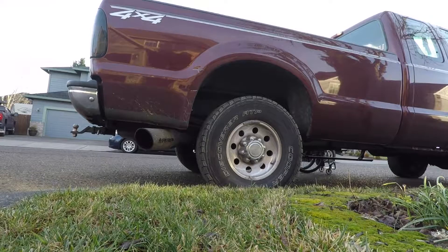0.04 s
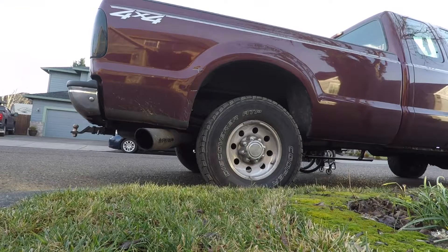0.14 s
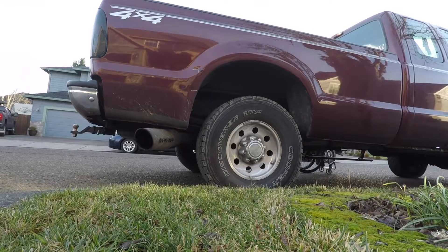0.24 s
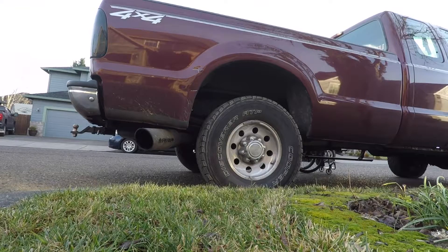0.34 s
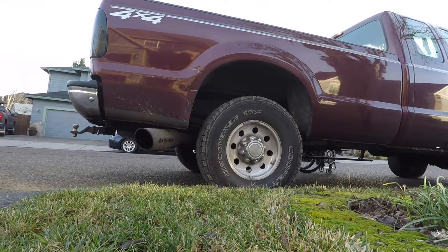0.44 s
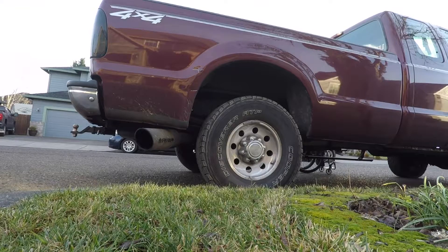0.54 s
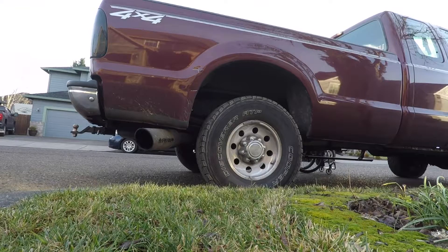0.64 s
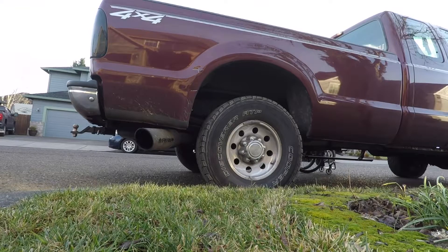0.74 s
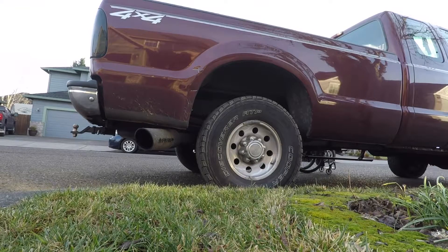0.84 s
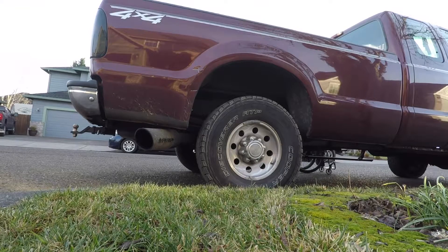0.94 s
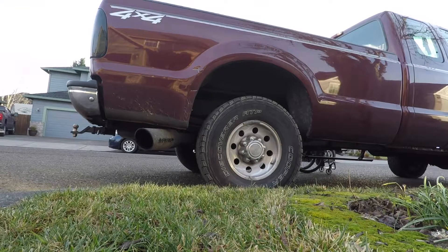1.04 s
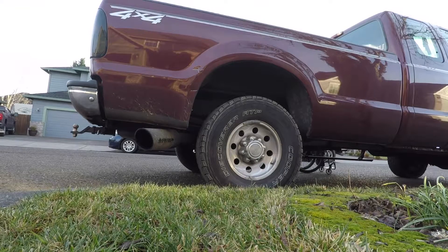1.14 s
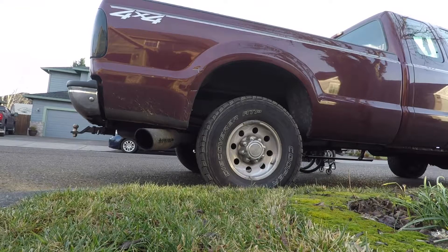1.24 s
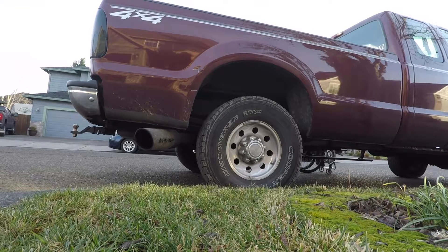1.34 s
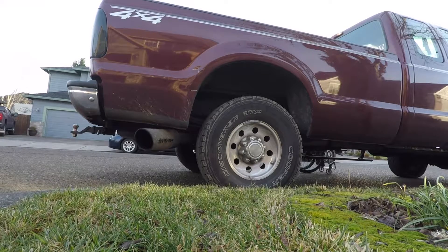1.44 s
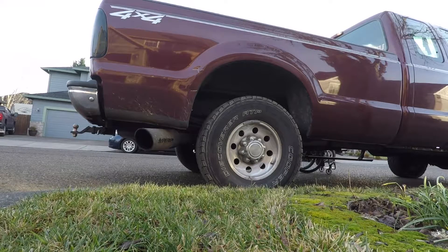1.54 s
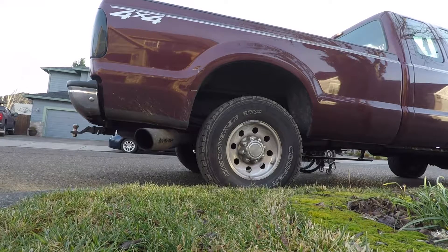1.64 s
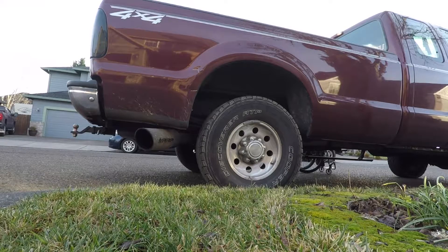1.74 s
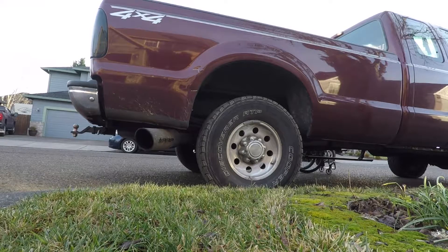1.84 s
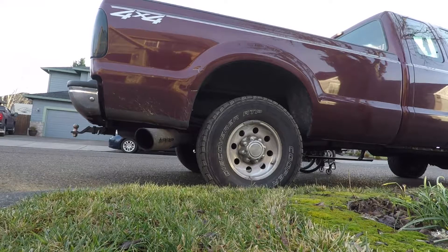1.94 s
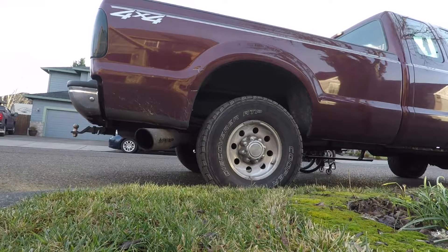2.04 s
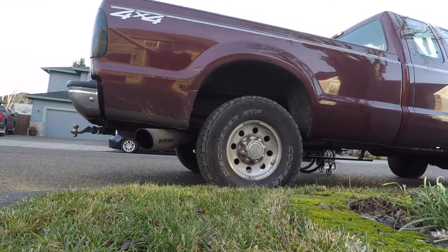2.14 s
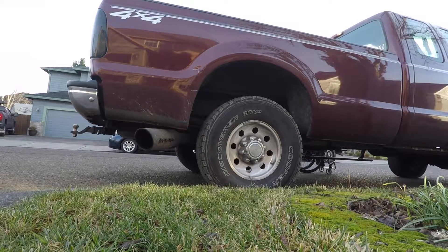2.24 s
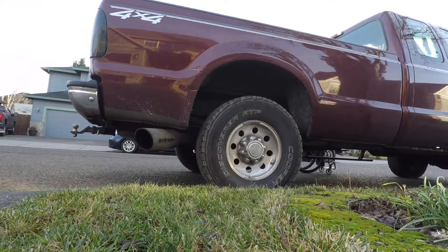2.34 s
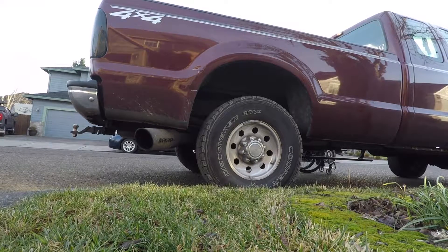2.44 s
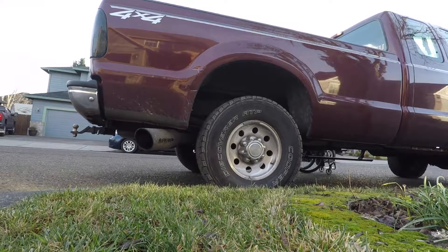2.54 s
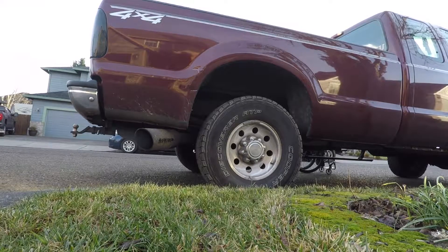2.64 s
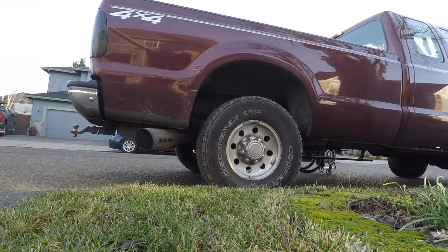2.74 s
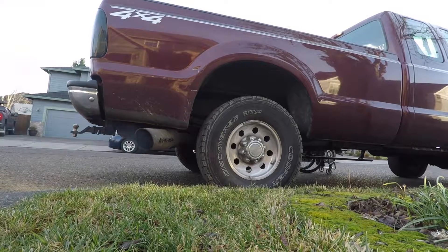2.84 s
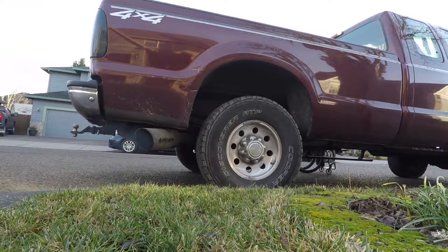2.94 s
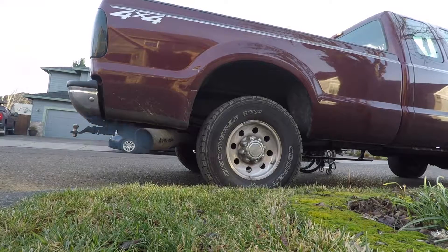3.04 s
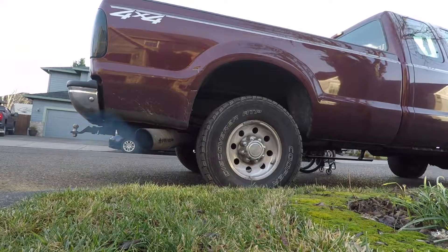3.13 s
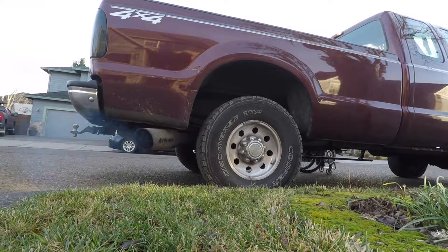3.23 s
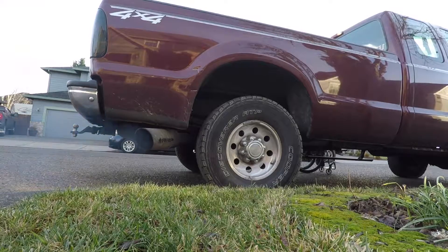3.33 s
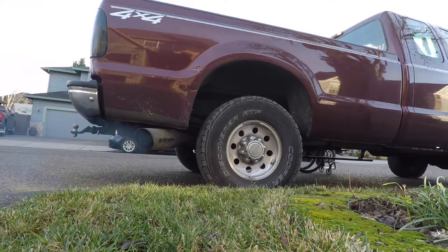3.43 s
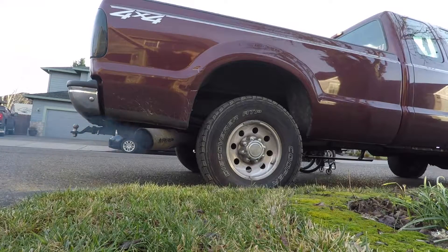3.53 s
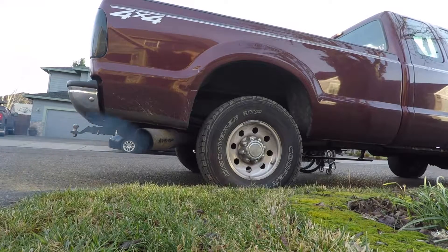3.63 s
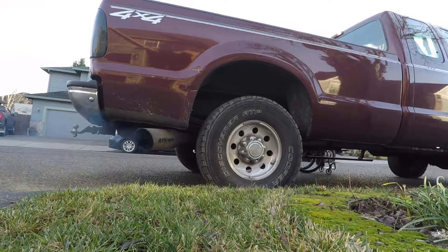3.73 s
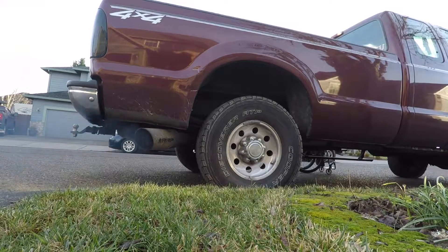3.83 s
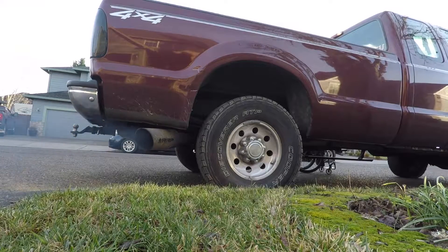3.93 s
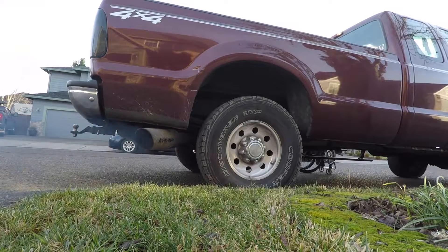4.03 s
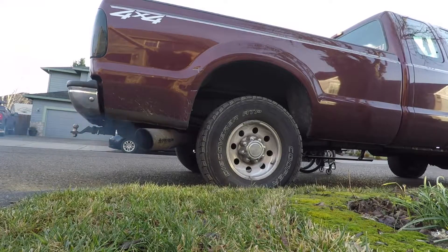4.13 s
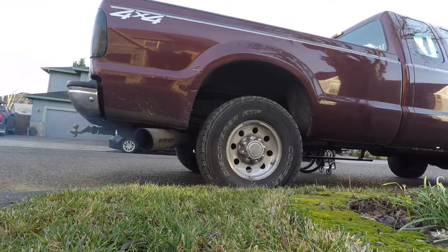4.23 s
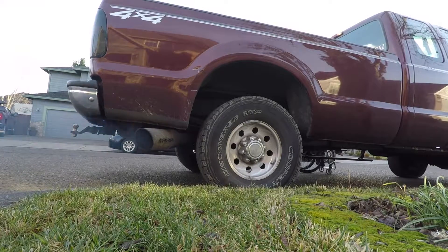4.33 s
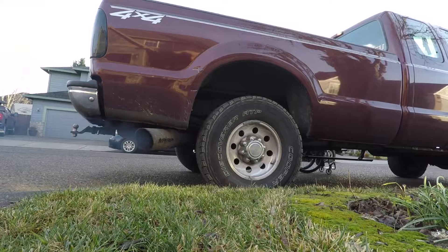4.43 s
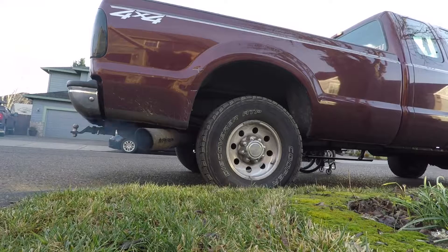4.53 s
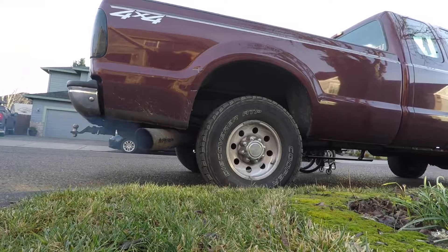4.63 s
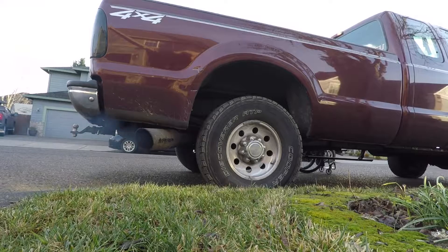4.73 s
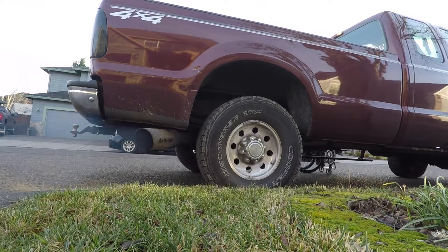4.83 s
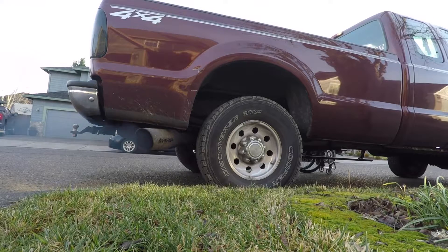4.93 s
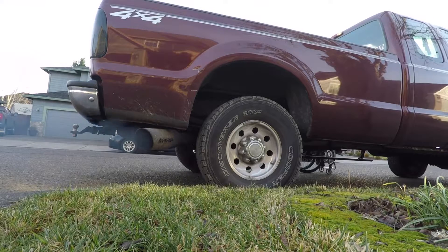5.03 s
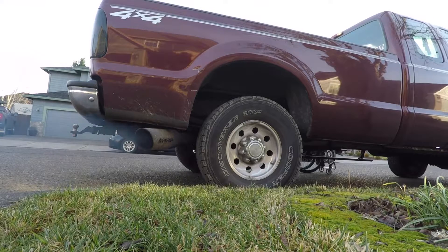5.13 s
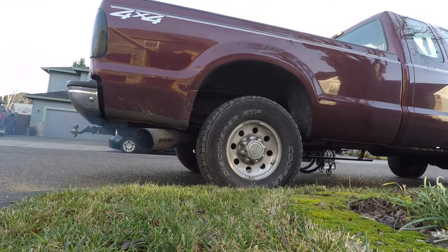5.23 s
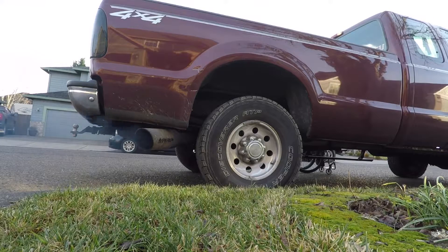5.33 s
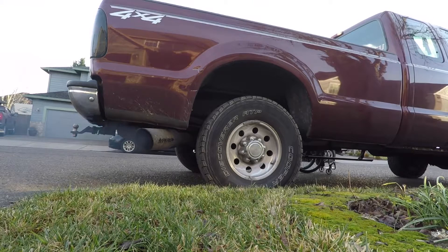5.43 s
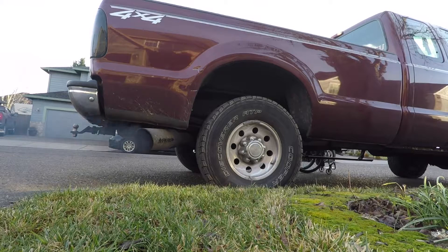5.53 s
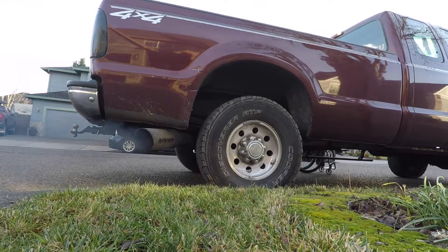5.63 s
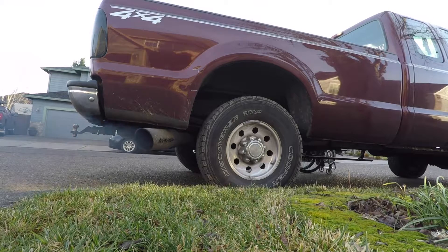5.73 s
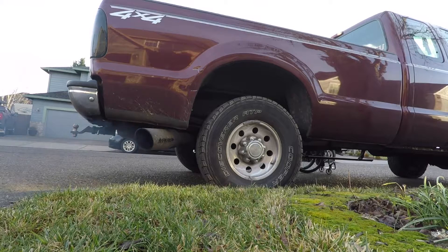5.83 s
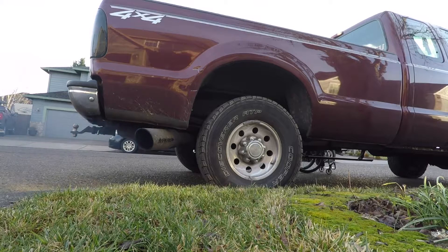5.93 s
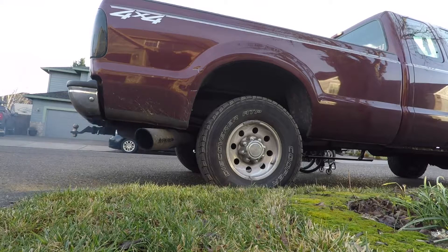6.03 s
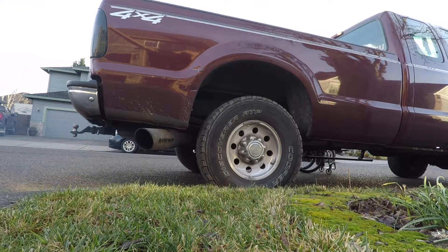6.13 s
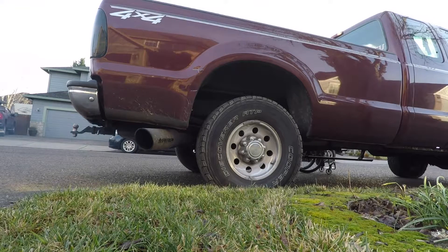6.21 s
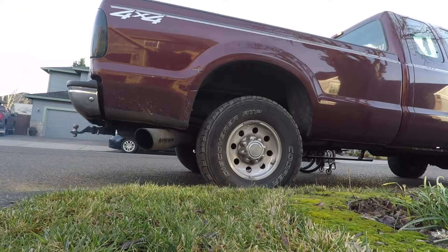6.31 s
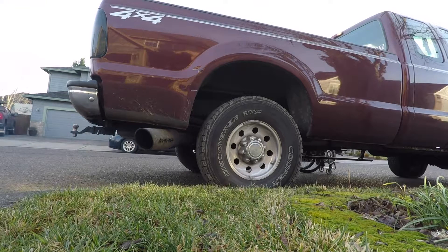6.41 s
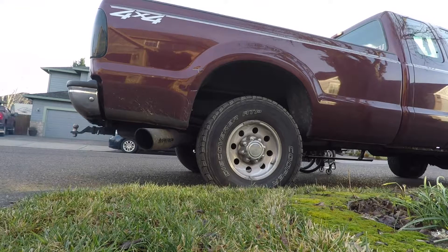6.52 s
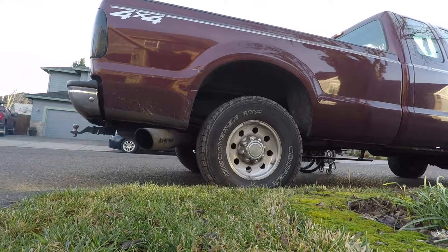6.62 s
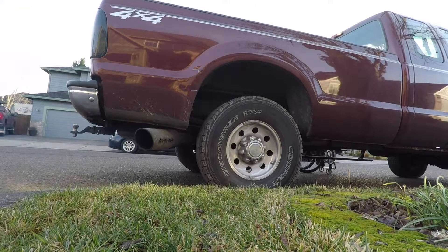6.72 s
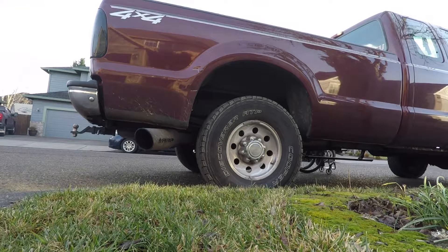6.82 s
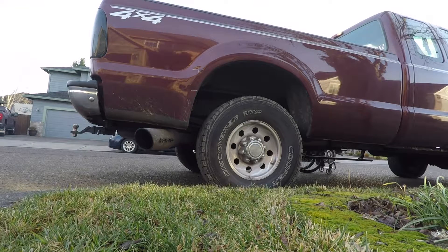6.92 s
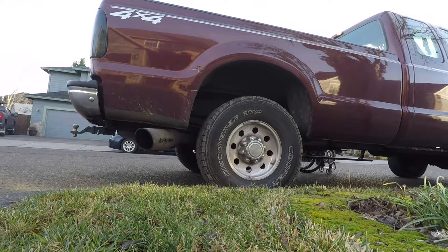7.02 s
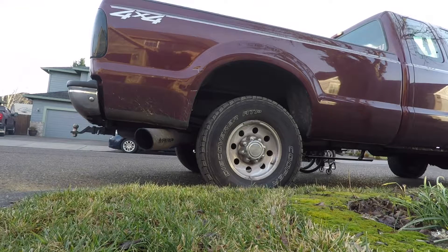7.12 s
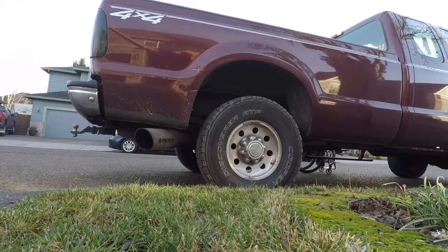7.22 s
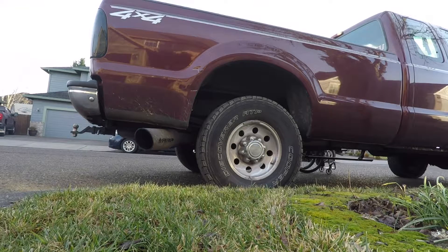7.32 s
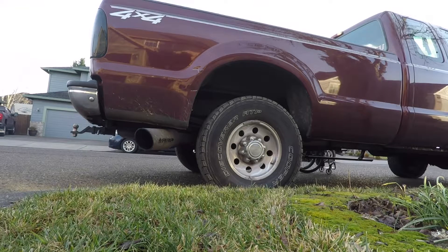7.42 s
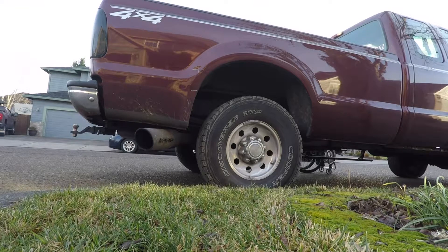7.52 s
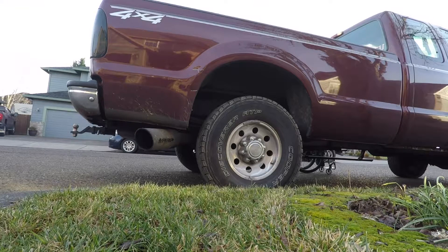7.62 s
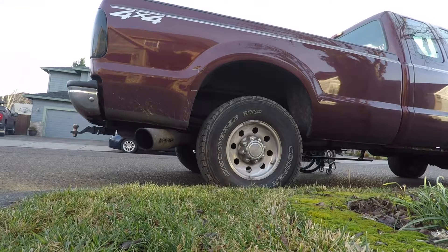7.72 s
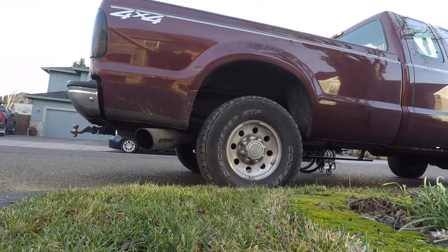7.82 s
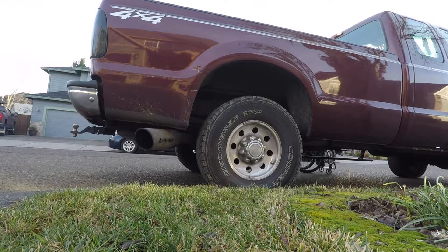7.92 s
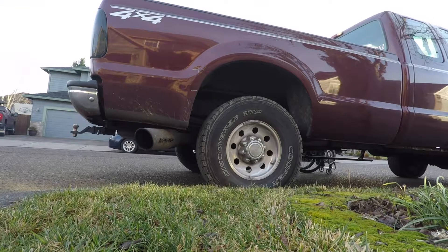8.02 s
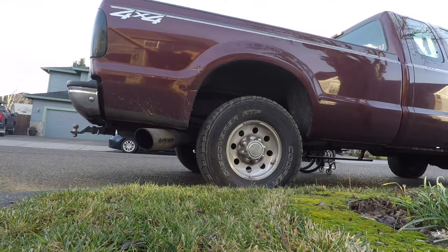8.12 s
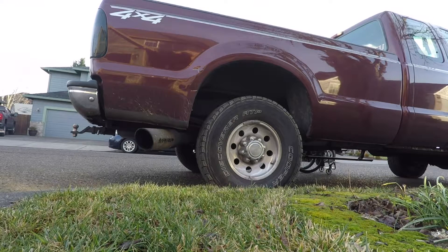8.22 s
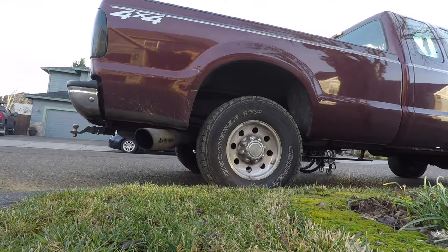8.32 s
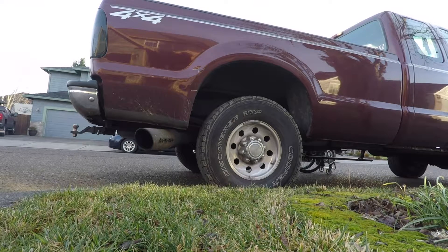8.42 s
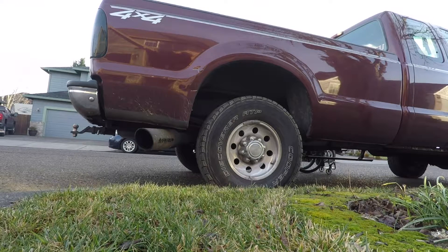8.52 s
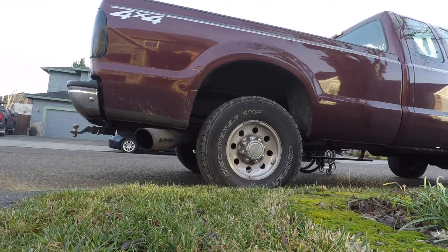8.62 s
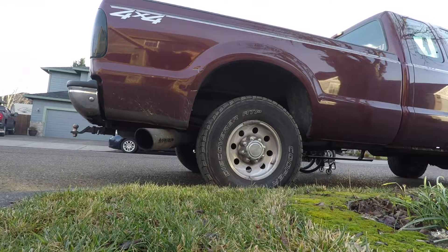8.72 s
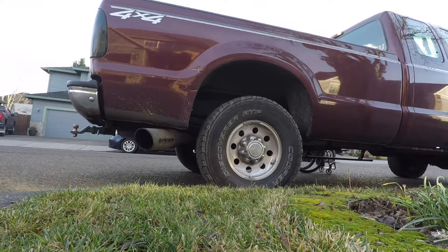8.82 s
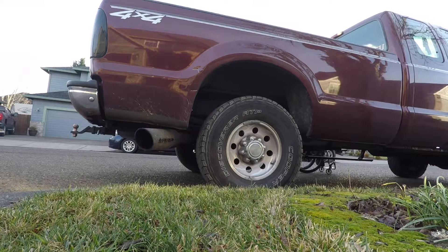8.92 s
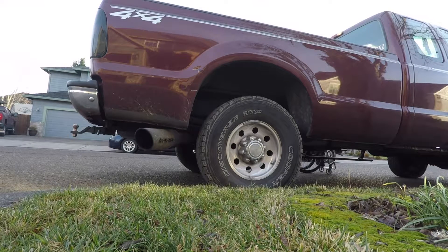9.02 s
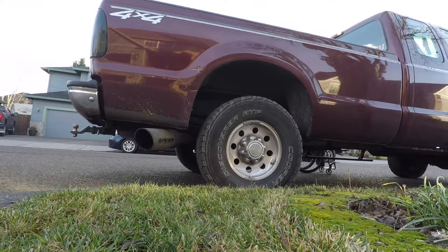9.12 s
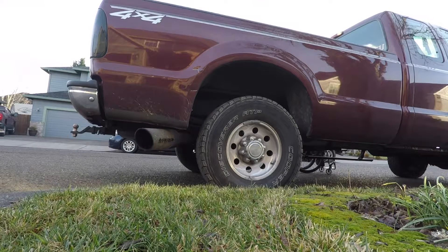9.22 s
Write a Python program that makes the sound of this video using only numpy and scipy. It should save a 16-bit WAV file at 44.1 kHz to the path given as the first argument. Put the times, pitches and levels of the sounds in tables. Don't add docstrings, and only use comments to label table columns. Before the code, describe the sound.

A starter clunks and grinds, then a big cold diesel catches, surging in six loud uneven bursts before settling into a slowly rising clattering idle.

```python
import sys
import numpy as np
from scipy import signal
from scipy.io import wavfile
from scipy.ndimage import uniform_filter1d

SR = 44100
rng = np.random.default_rng(int(sys.argv[2]) if len(sys.argv) > 2 else 0)


def makeup_ratio(level_db):
    decades = np.asarray(level_db, float) / 20
    return 10 ** decades


def bounce(signal):
    frames = np.transpose(np.atleast_2d(signal))
    limited = np.clip(frames, -1, 1)
    pcm = np.round(limited * 32767).astype(np.int16)
    wavfile.write(sys.argv[1], SR, pcm)


N = 408366
CRANKING = 2 * SR

# pitch_hz, density_db [dB per Hz]
AIR = [(140, -24), (230, -7), (310, -2.5), (382, -9), (755, -10), (838, -13.5), (5350, -31), (9850, -24.5),
       (15000, -40.5)]

# pitch_hz, density_db [dB per Hz]
GRIND = [(530, -50), (900, 1), (1270, -4), (1370, -4.5), (1620, -2.5), (1980, -1.5), (3170, -5),
         (4510, -5.5), (6580, -10), (7230, -16.5), (9040, -19.5), (11300, -33.5), (12700, -23),
         (15000, -40)]
# pitch_hz, density_db [dB per Hz]
GROWL = [(70, -80), (130, -26), (170, -7), (225, -17.5), (262, -8), (300, -14), (410, -10.5), (650, -19.5),
         (770, -18.5), (900, -44), (1200, -44)]
# pitch_hz, density_db [dB per Hz]
LURCH = [(15, -24), (30, -5.5), (45, -7.0), (70, -16.5), (130, -17), (200, -29)]
# pitch_hz, width_hz, lift_db
HOUSING = [(422, 34, 4.6), (747, 38, 8), (1464, 41, 7.3), (1770, 34, 9.2), (1970, 45, 6.3), (2510, 67, 6.6),
           (2900, 47, 7.7), (3560, 45, 6.1)]
# pitch_hz, width_hz, level_db
MESH = [(2195, 170, -14.5), (4130, 390, -16.5)]
# deepest_s, depth_db
COMPRESSIONS = [
    (.47, 3),
    (.595, 3),
    (.72, 3),
    (.84, 4),
    (0.961, 4),
    (1.08, 3),
    (1.21, 2.5),
    (1.309, -1),
]
# start_s, peak_db, pitch_hz
CLUNKS = [(0.062, -23, 301), (0.11, -13.5, 360), (0.129, -2.5, 427), (0.191, -16, 466), (0.381, -10, 454),
          (0.531, -14.5, 473.3), (0.649, -24, 566), (0.776, -28, 400), (0.88, -10, 374.3),
          (0.999, -9.5, 405), (1.119, -35, 408), (1.249, -14, 400), (1.419, -11, 680)]
# start_s, peak_db, pitch_hz
SNATCHES = [(0.3445, -26, 2150), (0.4508, -28, 2050), (0.4812, -24.5, 1400), (0.5465, -21, 2150),
            (0.608, -24, 1530), (0.6653, -22, 2040), (0.735, -23, 2540), (0.854, -23, 1374),
            (0.9741, -23, 1440), (1.026, -24.5, 2020), (1.0945, -20, 1400), (1.2245, -24, 2670),
            (1.3108, -24.5, 1550)]
# time_s, pitch_hz, level_db
OVERRUN = [
    (1.25, 3930, -11),
    (1.36, 4020, -10),
    (1.424, 4300, -11),
    (1.47, 4600, -5),
    (1.5, 4800, -24),
]

# start_s, cut_s, top_firing_hz, fuel_share [0-1], coast_s
SURGES = [
    (1.439, 1.722, 84.65, 0.88, 0.13),
    (2.043, 2.204, 69.86, 0.95, .11),
    (2.492, 2.669, 72.12, 0.97, 0.13),
    (3.015, 3.195, 75.9, 0.99, 0.14),
    (3.531, 3.704, 77, 0.98, .125),
    (4.005, 4.198, 78.56, 0.98, 0.19),
]
# time_s, firing_hz, fuel_share [0-1]
GOVERNOR = [(4.57, 31.83, 0.15), (4.635, 39.5, 0.79), (4.74, 45.57, 0.64), (4.87, 40.17, 0.44),
            (5.0, 34.86, 0.36), (5.07, 38.38, 0.74), (5.2, 41.96, 0.72), (5.27, 41.87, 0.61),
            (5.38, 40.13, 0.61), (5.56, 42.84, 0.69), (5.8, 42.83, 0.64), (6.2, 45.2, 0.65),
            (6.6, 47.12, 0.66), (6.9, 49.38, 0.72), (7.4, 51.05, 0.66), (8.4, 52.99, 0.72),
            (8.8, 53.29, 0.71), (9.26, 54.27, 0.75)]
# thump_db, lateness [share of firing gap], blast_db, clatter_db
CYLINDERS = [(2, 0.013, -3, 6.5), (-1, 0.043, 1, 7.5), (1, 0.0133, -4.5, -2.5), (-2, -0.0487, -1.5, 8.5),
             (0.2, 0.0094, 0.5, 6), (1.5, 0.0492, 1.5, 12), (1, -0.016, -1, 4), (0.2, -0.052, 0.5, 6)]

# pitch_hz, gain_db
PIPE = [(15, -29), (28, -24.5), (43, 0.5), (53, 4), (68, -0.5), (87, 3), (104, -0.5), (120, -5.5),
        (138, -12.5), (156, -7), (185, -12.5), (225, -10.5), (280, -29), (400, -40.5)]
# pitch_hz, width_hz, lift_db
PIPE_RINGS = [(88.6, 7.2, 5.5), (121, 11, 10.5), (150.8, 7.2, 5), (189, 5.8, 4.5), (222.9, 10.5, 6)]
# pitch_hz, density_db [dB per Hz]
RUMBLE = [(8, -18.0), (25, 1), (50, -2), (120, -5.5), (170, -8), (230, -10.5), (262, -30.0)]
# pitch_hz, gain_db
BOOM = [(50, -26.0), (85, -0.5), (120, 13), (150, -9.0), (190, 3.0), (260, -31)]

# pitch_hz, density_db [dB per Hz]
BLAST = [(100, -22.5), (175, -3.5), (220, -3.5), (258, -8), (338, 1), (422, -3.5), (502, -4), (536, -9.5),
         (647, -3), (856, -18.5), (969, -16.5), (1100, -31), (1250, -28.5), (1620, -59), (2750, -120)]
# pitch_hz, density_db [dB per Hz]
COAST = [(140, -21), (200, -4), (349, -0.5), (533, -6), (686, -8), (925, -15.5), (1500, -26), (1950, -79),
         (3300, -120)]
# pitch_hz, width_hz, lift_db
COAST_RINGS = [(187, 23, 8.7), (772, 44, 5.3)]
# start_s, peak_db, pitch_hz
BARKS = [(1.502, -4, 573), (1.528, -6, 390), (1.556, -7.5, 515), (1.579, -1, 425), (1.637, -4, 660),
         (1.74, -10.5, 652), (1.773, -14, 594), (1.871, -18, 656), (1.937, -17.5, 430),
         (2.021, -21, 444), (2.057, -15, 557), (2.085, -21, 336), (2.106, -4.5, 356), (2.151, -3, 554),
         (2.535, -12, 424), (2.558, -9.5, 387.6), (2.575, -9, 546), (2.6, -7, 396),
         (2.671, -15.5, 452), (2.884, -21, 407), (2.966, -26, 511), (3.035, -18, 484),
         (3.055, -13, 403.3), (3.088, -3.5, 340), (3.123, -2, 447), (3.167, -7.5, 666),
         (3.407, -26, 645), (3.486, -26.5, 300.9), (3.525, -20, 421), (3.568, -20, 301),
         (3.568, -14, 310), (3.607, 1, 340), (3.642, -4.5, 776), (3.684, -6.5, 657), (3.729, -14, 629),
         (4.043, -13.5, 435.3), (4.067, -8, 480), (4.087, -8, 410), (4.108, -1, 447),
         (4.196, -3.5, 593), (4.229, -16, 655), (4.461, -18.5, 345), (4.53, -15.5, 338.6),
         (4.559, -16, 452.7), (4.598, -16, 533), (4.617, -6, 354), (4.649, -11, 355), (4.69, -10, 413),
         (4.717, -13, 431.8), (4.752, -9, 452), (4.804, -8.5, 676.4), (4.898, -23, 633),
         (4.93, -14.5, 590.5), (4.984, -17, 317.3), (5.023, -12, 343), (5.079, -11.5, 530),
         (5.146, -8, 366), (5.193, -15, 636), (5.386, -10.5, 339), (5.486, -8, 644),
              (5.61, -8.5, 470.9), (5.672, -17, 680), (5.703, -9.5, 367), (5.769, -7, 330.8),
              (5.857, -11, 322.6), (5.908, -9, 580), (6.214, -14.5, 650.3), (6.303, -14.5, 462.6),
              (6.435, -13.5, 471), (6.477, -9, 336), (6.518, -6, 350), (6.584, -12, 473),
              (6.647, -13.5, 638), (6.775, -14.5, 587), (6.811, -15.5, 353), (6.935, -11, 606),
              (7.058, -18, 646), (7.159, -13, 334), (7.258, -10, 603), (7.403, -4, 705),
              (7.569, -4.5, 333.2), (7.84, -9.5, 637), (7.995, -8, 298), (8.147, -12, 630),
              (8.299, -10.5, 300), (8.376, -11.5, 670), (8.45, -13, 346.1), (8.489, -7.5, 357),
              (8.527, -16, 326), (8.641, -10.5, 658), (8.679, -17, 322), (8.83, -8, 509.8),
              (8.978, -8, 480), (9.05, -8, 659), (9.091, -10.5, 534), (9.236, -12.5, 597)]

# pitch_hz, density_db [dB per Hz]
CLATTER = [(590, -35), (1000, -7), (1120, -14), (1210, -4), (1650, 0), (2740, -13), (2970, -11.5),
           (4030, -11), (4310, -18), (5660, -23), (6060, -24), (7600, -25.5), (11200, -47), (12900, -38.5),
           (15000, -49.5)]
# pitch_hz, density_db [dB per Hz]
HARD_CLATTER = [(590, -11), (1000, 5), (1170, -39), (1390, -3.5), (1700, -2), (2370, -8.5), (2740, -18.5),
                (2930, -8.5), (3440, -4.5), (5290, -19), (6200, -17.5), (8200, -25.5), (11200, -42.5),
                (13100, -35.5), (15000, -42)]
# pitch_hz, width_hz, lift_db
BLOCK = [(1610, 170, 2.25), (2056, 59, 4.8), (2580, 25, 1.3), (2984, 100, 4.1), (3420, 77, 3.3),
         (3920, 92, 0.92), (4704, 140, 6.3), (6180, 180, 4.8)]
# start_s, peak_db, pitch_hz
KNOCKS = [(1.5076, -13, 1670), (1.539, -13, 1610), (1.563, -17, 1770), (1.586, -18, 1890),
          (1.6283, -19, 1990), (1.6408, -14, 1820), (1.703, -28, 1920), (1.7914, -26.5, 1720),
          (1.951, -33, 1450), (1.99, -28.5, 1450), (2.0494, -29, 1510), (2.0648, -32, 1470),
          (2.0912, -20, 1520), (2.1146, -13, 1470), (2.1727, -21.5, 3920), (2.5014, -33, 1560),
          (2.5327, -24, 1530), (2.5602, -23, 1730), (2.5838, -14.5, 1490), (2.648, -10.5, 1640),
          (2.8083, -36, 1397), (2.9804, -37, 1420), (3.0168, -35, 1679), (3.0441, -20.5, 1760),
          (3.0742, -14.5, 1530), (3.1304, -14, 1670), (3.2547, -24, 1676), (3.3359, -38, 1419),
          (3.3923, -42, 1427), (3.4192, -31, 1396), (3.5647, -17.5, 1640), (3.5924, -12.5, 1415),
          (3.7899, -30, 1662), (3.9815, -28, 1697), (4.0508, -25, 1569), (4.0708, -18, 2000),
          (4.0957, -14.5, 3050), (4.2815, -28, 1556), (4.3183, -32, 1431), (4.4741, -28, 1616),
          (4.5317, -34, 1721), (4.5665, -29, 1677), (4.598, -24, 1310), (4.625, -17, 1530),
          (4.6509, -16.5, 1600), (4.693, -21, 1560), (4.7171, -17.5, 1707), (4.7816, -27, 1664),
          (4.8031, -27, 1562), (4.829, -27, 1674), (4.851, -32, 1540), (4.8784, -32, 1550),
          (4.9069, -29, 1510), (4.9378, -33, 1620), (4.9672, -33, 1563), (4.9916, -26, 1647),
          (5.0245, -21, 1710), (5.051, -25.5, 1989), (5.0773, -22, 1610), (5.1042, -23, 1677),
          (5.1264, -17.5, 1650), (5.2226, -17, 1510), (5.346, -24.5, 1380), (5.3962, -20.5, 1490),
               (5.4251, -18, 1610), (5.5204, -17.5, 1610), (5.5873, -20.5, 1620), (5.7033, -23, 1640),
               (5.7728, -25, 1340), (5.8474, -20, 1520), (5.9824, -15.5, 1612), (6.0688, -18, 1580),
               (6.133, -28.5, 1691), (6.244, -20, 1536), (6.3103, -21, 1450), (6.375, -19, 1650),
               (6.5057, -19.5, 1740), (6.596, -22, 1480), (6.676, -20, 1780), (6.7172, -23.5, 1520),
               (6.818, -20.5, 1470), (6.8768, -20.5, 1570), (7.001, -22, 1560), (7.0802, -18, 1660),
               (7.141, -24, 1610), (7.2015, -28, 1650), (7.2435, -20, 1530), (7.323, -21, 1540),
               (7.3577, -22.5, 1590), (7.4004, -24.5, 1620), (7.4567, -18, 1630), (7.515, -22.5, 1620),
               (7.5555, -23, 1720), (7.6127, -25, 1480), (7.67, -24.5, 1790), (7.7151, -18.5, 1645),
               (7.7717, -22, 1460), (7.8252, -31.5, 1700), (7.8686, -18, 1530), (7.9444, -18, 1880),
               (7.9853, -25.5, 1635), (8.0216, -20.5, 1450), (8.0781, -22.5, 1520), (8.1734, -17, 1440),
               (8.2287, -22, 2000), (8.2903, -20.5, 1650), (8.323, -18.5, 1610), (8.3799, -22.5, 1770),
               (8.4373, -23, 1710), (8.4818, -18.5, 1600), (8.552, -20, 1590), (8.6297, -20, 1620),
               (8.702, -20.5, 1550), (8.779, -19, 1770), (8.8508, -23, 1630), (8.909, -21, 1580),
               (8.983, -20.5, 1498), (9.0773, -18.5, 1610), (9.1493, -19, 1650), (9.1883, -19, 1530)]


def evened(x):
    return x / np.sqrt(np.mean(x ** 2) + 1e-20)


def columns(rows):
    time_s, *values = np.transpose(rows)
    return [np.interp(np.arange(N) / SR, time_s, v) for v in values]


def fade(start, end):
    return np.clip((np.arange(N) / SR - start) / (end - start), 0, 1)


def blend(alike, loose, share):
    return np.sqrt(share) * alike + np.sqrt(1 - share) * loose


def colour(x, points, rings=()):
    hz, db = np.transpose(points)
    size = 16384
    grid = np.abs(np.fft.fftfreq(size, 1 / SR)) + 1
    gain_db = np.interp(np.log(grid), np.log(hz), db, left=-90, right=-90)
    gain_db += sum(lift / (1 + (2 * (grid - f) / width) ** 2) for f, width, lift in rings)
    log_response = np.conj(signal.hilbert(np.log(makeup_ratio(gain_db))))
    taps = np.fft.ifft(np.exp(log_response)).real[:size // 2]
    return evened(signal.oaconvolve(x, taps)[:len(x)])


def resonate(x, hz, width):
    turn = np.exp(2j * np.pi * np.cumsum(hz * np.ones(len(x))) / SR)
    r = np.exp(-np.pi * width / SR)
    at_zero_hz = signal.lfilter([1], [1, -2 * r, r * r], x / turn)
    return evened((turn * at_zero_hz).real)


def strikes(events, width, rise, fall, sag, hush, before, fuzz):
    u = np.arange(3000) / SR
    shape = (1 - np.exp(-u / rise)) * np.exp(-u / fall)
    shape = shape / shape.max()
    rings, gate, marks = np.zeros((3, N + len(u)))
    for (start_s, db, hz), noise in zip(events, rng.standard_normal((len(events), len(u)))):
        at = round(start_s * SR)
        glide_hz = hz * (1 - sag * u)
        pure = np.sin(2 * np.pi * np.cumsum(glide_hz) / SR)
        tone = (1 - fuzz) * pure + fuzz * resonate(noise, glide_hz, width)
        rings[at:at + len(u)] += makeup_ratio(db) * shape * tone
        gate[at:at + len(u)] += makeup_ratio(db) * shape
        marks[max(at - round(before * SR), 0):at + round(fall * SR)] = 1
    return rings[:N], gate[:N], 1 - hush * uniform_filter1d(marks[:N], size=130)


def street():
    hum = np.sqrt(2) * np.sin(2 * np.pi * 151.6 * np.arange(N) / SR)
    hum *= 1 - fade(0.45, 0.87)
    air_db = -36.5 - 14.5 - 4.6 * fade(.1, 2.0)
    return makeup_ratio(air_db) * colour(rng.standard_normal(N), AIR) + makeup_ratio(-39.5) * hum


def gear_grind():
    t = np.arange(CRANKING) / SR
    mesh_s, engage_s, slam_db = 0.089, 0.1255, 9
    approach_db = np.interp(t, [mesh_s, mesh_s + 0.0017, engage_s], [-13.5, 0, slam_db])
    settle_db = slam_db * np.exp((engage_s - t) / 0.0077)
    level_db = -32.5 + np.where(t < engage_s, approach_db, settle_db)
    level_db += -0.5 * fade(0.48, 1.4)[:CRANKING]
    level_db += 9 * fade(1.46, 1.8)[:CRANKING]

    drag = sum(db * np.exp(-((t - s) / np.where(t < s, .04, .009)) ** 2) for s, db in COMPRESSIONS)
    speed = 1 - 0.039 * uniform_filter1d(drag, size=1800) + 0.053 * fade(1.5, 2.9)[:CRANKING]
    tooth_db = 1.5 * np.minimum(rng.exponential(1, CRANKING // 63), 3).repeat(63)
    teeth = rng.standard_normal(CRANKING) * makeup_ratio(tooth_db)

    whine = sum(makeup_ratio(db) * resonate(teeth[::-1], hz * speed, width) for hz, width, db in MESH)
    song_hz, song_db = (v[:CRANKING] for v in columns(OVERRUN))
    song_gate = (fade(1.22, 1.26) - fade(1.5, 1.52))[:CRANKING]
    whine += makeup_ratio(song_db) * song_gate * resonate(teeth[::-1], song_hz, 280.)

    bright = makeup_ratio(2.5 - 1.35 * drag) * (colour(teeth, GRIND, HOUSING) + whine)
    dull = makeup_ratio(5.5 - 1.0 * drag) * colour(teeth, GROWL, HOUSING)
    release = (1 - 0.3 * fade(1.2857, 1.287)[:CRANKING]) * (1 - fade(1.44, 1.79)[:CRANKING])
    return makeup_ratio(level_db) * (bright + dull) * release


def lurching():
    t = np.arange(CRANKING) / SR
    level_db = -30.5 + 9 * (t - .6) - 13 * (1 - fade(.25, 0.55)[:CRANKING])
    gate = (fade(0.13, 0.33) - fade(1.6, 2.0))[:CRANKING]
    return makeup_ratio(level_db) * colour(rng.standard_normal(CRANKING), LURCH) * gate


def starter():
    out = np.zeros(N)
    out[:CRANKING] = gear_grind() + lurching()
    rings, _, hush = strikes(SNATCHES, width=190., rise=.004, fall=.03, sag=1.3, hush=.3, before=.02, fuzz=.9)
    out = hush * out + makeup_ratio(-12) * rings
    u = np.arange(4000) / SR
    shape = (1 - np.exp(-u / 0.00287)) * np.exp(-u / 0.027)
    for start_s, db, hz in CLUNKS:
        blow = np.gradient(rng.standard_normal(len(u)))
        out[round(start_s * SR):][:len(u)] += makeup_ratio(db - 9.5) * resonate(blow, hz, 150.0) * shape
    click_s = .061
    return out * fade(click_s, click_s + .001)


def throttle():
    t = np.arange(N) / SR
    stall_hz = 25.043
    hz = np.full(N, 23.94)
    fuel = np.zeros((3, N))
    left = np.array([[0.85], [0.86], [0.63]])
    for on, cut, top_hz, share, coast in SURGES:
        u = np.clip((t - on) / (cut - on), 0, 1)
        after = np.maximum(t - cut, 0)
        start_hz = hz[round(on * SR)]
        racing = start_hz + (top_hz - start_hz) * u ** 1.3
        hz = np.where(t < on, hz, stall_hz + (racing - stall_hz) * np.exp(-after / coast))

        opening = np.interp(u, [0, 0.312, 1], [0, 0.82, 1])
        opening = np.array([opening, opening, opening ** 1.4])
        after = np.maximum(after - 0.0095, 0)
        pipe_tail = np.exp(-(after / coast) ** 2.4)
        slow_tail = np.exp(-after / (0.65 * coast))
        tails = np.array([pipe_tail, slow_tail, slow_tail])
        decay = (1 - left) * np.exp(-after / 0.018) + left * tails
        fuel = np.maximum(fuel, share * opening * decay)

    idle_hz, idle = columns(GOVERNOR)
    held = fade(GOVERNOR[0][0] - .06, GOVERNOR[0][0])
    fuel += held * ([idle ** 0.7, idle, idle] - fuel)
    thump_db = -24 + 16.5 * fuel[0] + 4 * (1 - fade(1.52, 1.54))
    blast_db = -37 + 23 * fuel[1]
    clatter_db = -46 + 24 * fuel[2] + 14 * (1 - fade(1.45, 1.54))
    return hz + held * (idle_hz - hz), thump_db, blast_db, clatter_db


def puffs(at, db, rise, fall, rest):
    t = np.arange(SR // 10) / SR
    train = np.zeros(N)
    train[at] = makeup_ratio(db)
    gate = signal.oaconvolve(train, (1 - np.exp(-t / rise)) * np.exp(-t / fall))[:N]
    slow = uniform_filter1d(gate, size=5500) + 1e-9
    return (rest + gate / slow) * rng.standard_normal(N)


def signatures(at, db, rise, fall):
    t, out = np.arange(SR // 10) / SR, np.zeros(N)
    count = len(CYLINDERS)
    shapes = rng.standard_normal((count, len(t))) * (1 - np.exp(-t / rise)) * np.exp(-t / fall)
    for k, shape in enumerate(shapes):
        train = np.zeros(N)
        train[at[k::count]] = makeup_ratio(db[k::count])
        out += signal.oaconvolve(train, shape)[:N]
    return out / np.sqrt(uniform_filter1d(out ** 2, size=8000) + 1e-9)


def pings(at):
    u, out = np.arange(1300) / SR, np.zeros(N + 2000)
    pick, tune, wait, size = rng.random((1000, 4))[:len(at)].T
    panel = (pick * (len(BLOCK) - 2)).astype(int)
    hz = np.array(BLOCK)[panel, 0] * (.95 + 0.12 * tune)
    table_hz, table_db = np.transpose(CLATTER)
    db = np.interp(hz, table_hz, table_db) * 0.27 + 9 * size
    shape = (1 - np.exp(-u / 0.0027)) * np.exp(-u / 0.007)
    rings = makeup_ratio(db)[:, None] * np.sin(2 * np.pi * hz[:, None] * u) * shape
    for start, ring in zip(at + (wait * 500).astype(int), rings):
        out[start:start + len(u)] += ring
    return evened(out[:N])


def block_clatter(at, knock_db, chance, clatter_db, coasting, full):
    at = np.minimum(at + round(.007 * SR), N - 1)
    knock = puffs(at, knock_db + 1.8 * chance, 0.0035, 0.011, 0.5 + 0.45 * coasting)
    crackle = puffs(at, knock_db + 3.5 * chance, .0025, .007, .65)
    soft, hard = colour(knock, CLATTER, BLOCK), colour(crackle, HARD_CLATTER, BLOCK)
    clatter = makeup_ratio(clatter_db) * ((1 - full) * soft + full * hard)
    clatter += makeup_ratio(clatter_db - 14.5 - 7 * coasting) * pings(at)
    rings, gate, hush = strikes(KNOCKS, width=400., rise=.0022, fall=.007, sag=0.3,
                                hush=.25, before=.007, fuzz=.45)
    hiss = colour(rng.standard_normal(N), HARD_CLATTER, BLOCK)
    return hush * clatter + makeup_ratio(-5) * rings + makeup_ratio(-11) * gate * hiss


def exhaust_jet(at, jet_db, chance, coasting):
    loose = evened(puffs(at, jet_db + 2.5 * chance, 0.001, 0.02, 1.0))
    alike = signatures(at, jet_db + 1.0 * chance, 0.0024, 0.017)
    low, high = (blend(alike, loose, share * (1 - coasting)) for share in (.93, .6))
    below_300_hz = signal.butter(2, 300, fs=SR, output='sos')
    return high + signal.sosfiltfilt(below_300_hz, low - high)


def mouth_blast(jet, blast_db, coasting):
    firing = colour(jet, BLAST)
    idle_flow = colour(jet, COAST, COAST_RINGS)
    blast = makeup_ratio(blast_db + 4.0) * ((1 - coasting) * firing + coasting * idle_flow)
    rings, gate, hush = strikes(BARKS, width=220.0, rise=0.00056, fall=0.0086, sag=1.8,
                                hush=0.47, before=0.0083, fuzz=0.31)
    rush = colour(rng.standard_normal(N), BLAST)
    return hush * blast + makeup_ratio(-1.5) * rings + makeup_ratio(-6.5) * gate * rush


def pipe_thump(kicks, jet, thump_db, coasting, full):
    pulses = makeup_ratio(-3 * coasting) * colour(kicks, PIPE, PIPE_RINGS)
    rumble = makeup_ratio(-14.5 + 11.8 * coasting) * colour(jet, RUMBLE, PIPE_RINGS)
    thump = makeup_ratio(thump_db) * (pulses + rumble)
    thump += makeup_ratio(thump_db - 8) * full * colour(kicks, BOOM)
    lag = 2 * np.pi * 20
    return signal.lfilter(*signal.bilinear([-1, lag], [1, lag], SR), thump)


def engine():
    hz, thump_db, blast_db, clatter_db = throttle()
    coasting = np.clip((-23.5 - blast_db) / 8, 0, 1)
    full = np.clip((clatter_db + 29.5) / 5.4, 0, 1)
    at = np.flatnonzero(np.diff(np.floor(np.cumsum(hz) / SR)))
    kick_db, late, jet_db, knock_db = np.array(CYLINDERS)[np.arange(len(at)) % len(CYLINDERS)].T
    chance = rng.standard_normal((1000, 4))[:len(at)].T
    ragged = 1 + 6 * coasting[at]
    delay = ((late + .008 * ragged * chance[0]) * SR / hz[at]).astype(int)
    at = np.clip(at + delay - 700, 0, N - 1)
    kicks = np.zeros(N)
    kicks[at] = makeup_ratio(kick_db + 0.41 * ragged ** .5 * chance[1]) / hz[at]

    jet = exhaust_jet(at, jet_db, chance[2], coasting)
    thump = pipe_thump(kicks, jet, thump_db, coasting, full)
    blast = mouth_blast(jet, blast_db, coasting)
    clatter = block_clatter(at, knock_db, chance[3], clatter_db, coasting, full)
    return fade(1.35, 1.365) * thump + fade(1.23, 1.31) * blast + fade(1.4, 1.52) * clatter


def scene():
    return (street() + starter() + engine())[None]


def roll_off(x):
    return signal.sosfilt(signal.butter(12, 15140, fs=SR, output="sos"), x)


def record(dry):
    ceiling = .99
    mix = ceiling * np.tanh(dry / ceiling)
    return roll_off(mix)


dry = scene()
out = record(dry)
bounce(out)
```